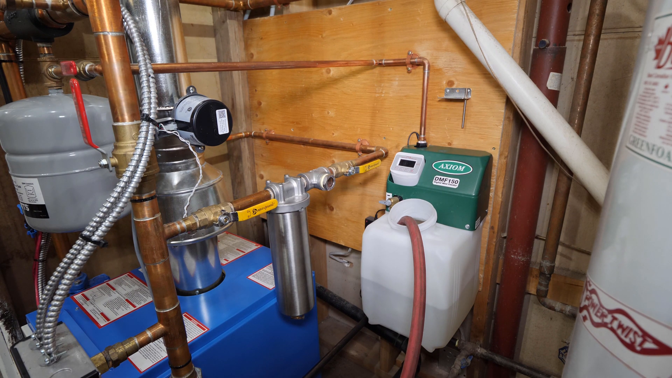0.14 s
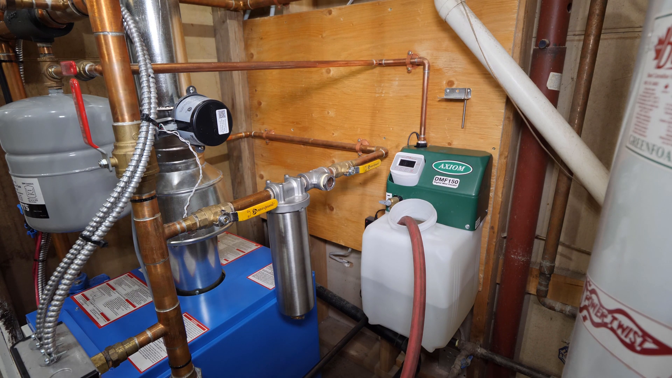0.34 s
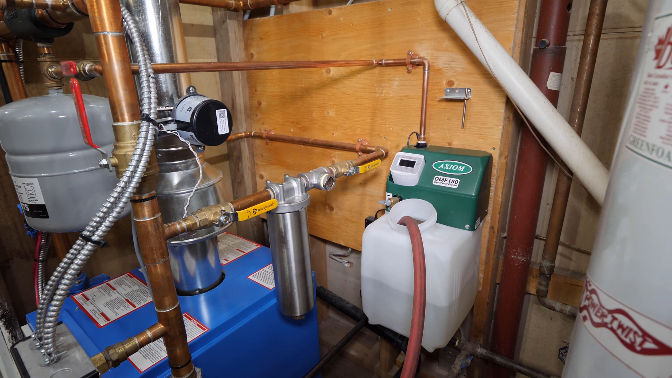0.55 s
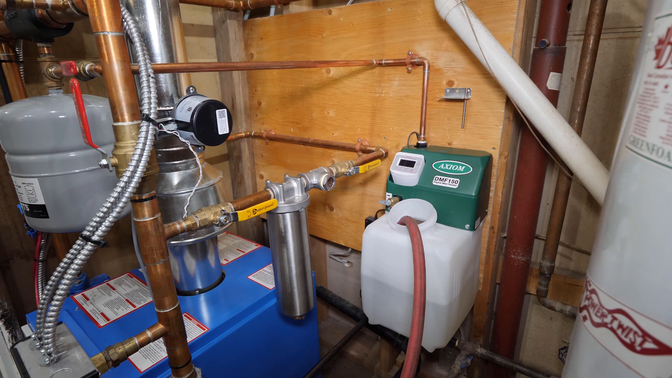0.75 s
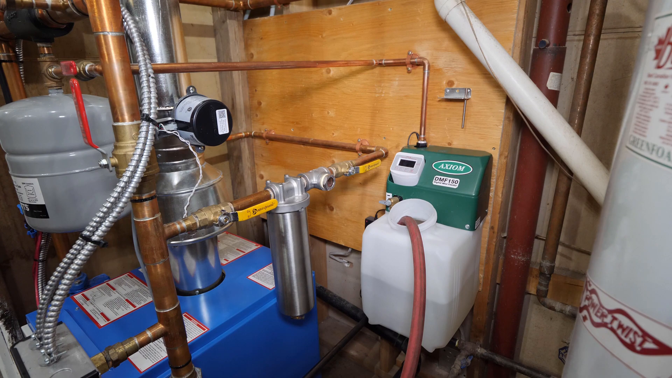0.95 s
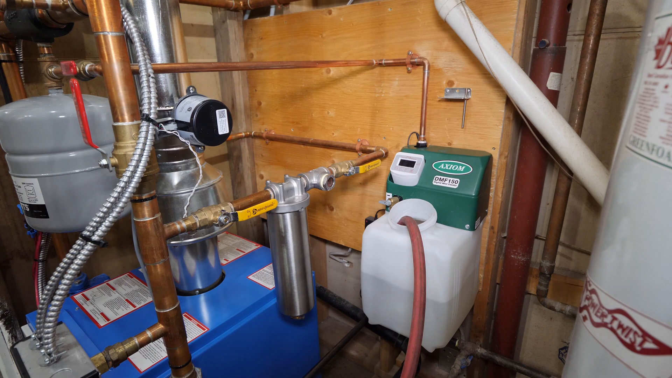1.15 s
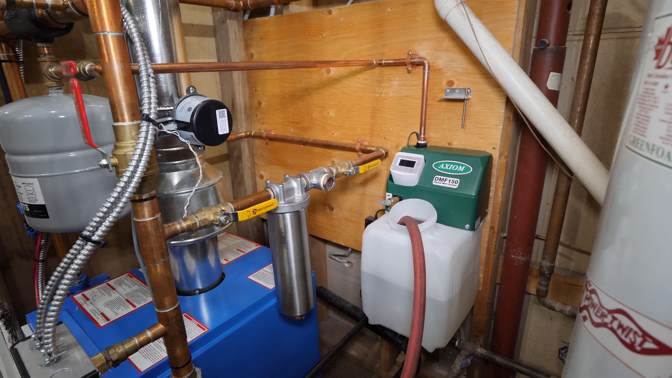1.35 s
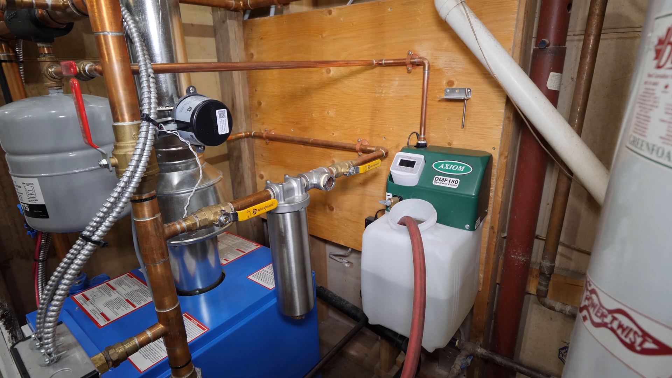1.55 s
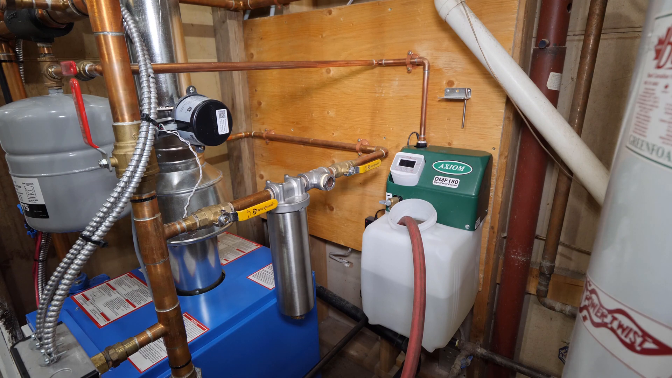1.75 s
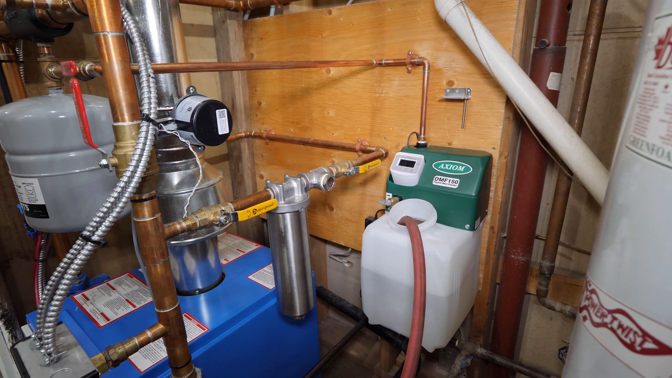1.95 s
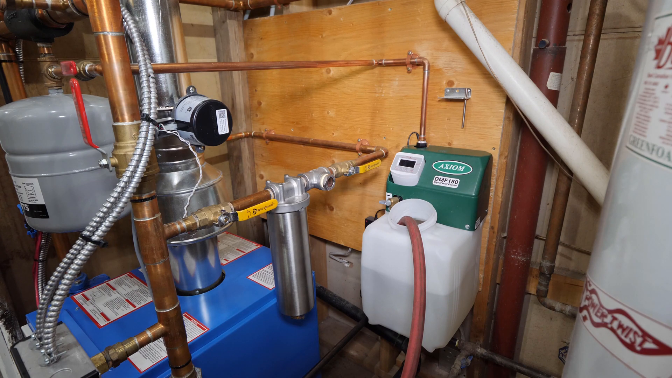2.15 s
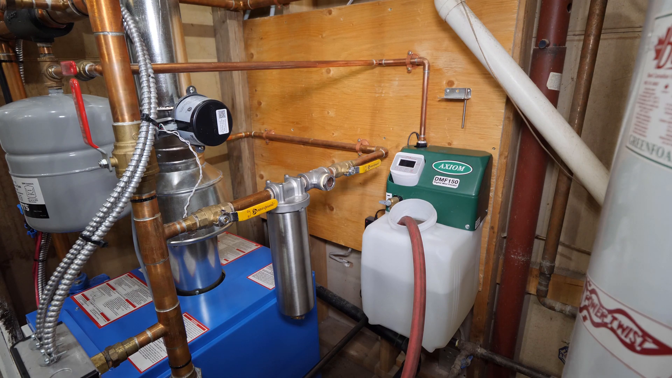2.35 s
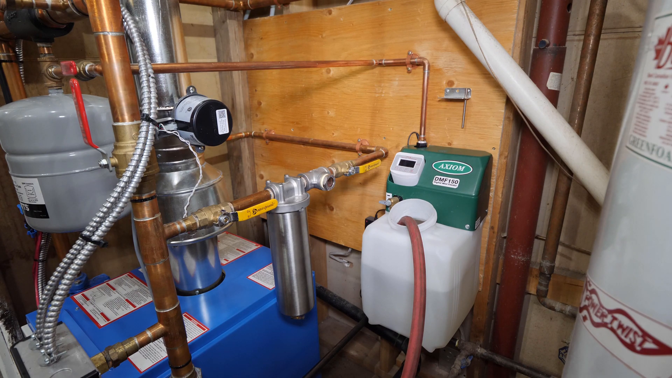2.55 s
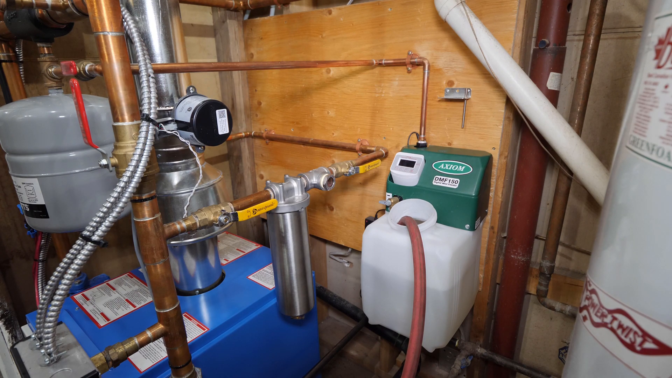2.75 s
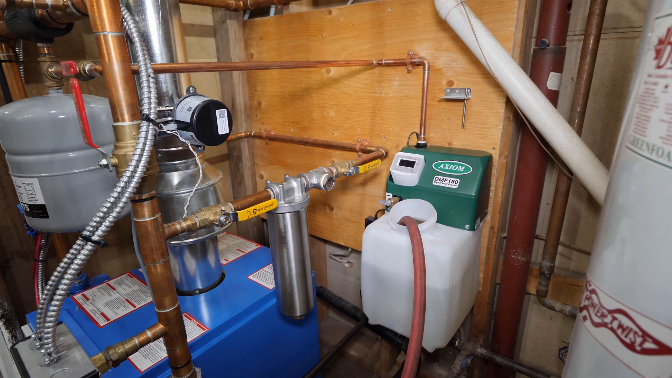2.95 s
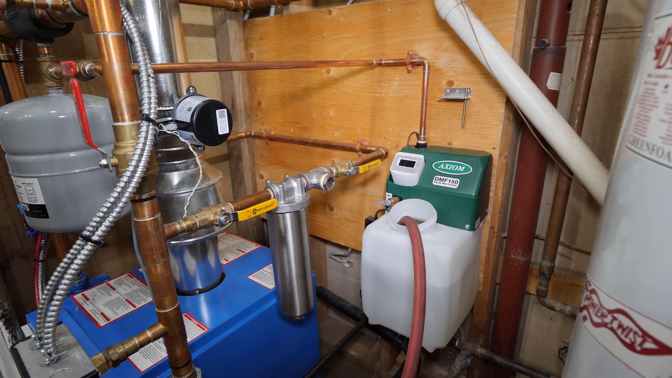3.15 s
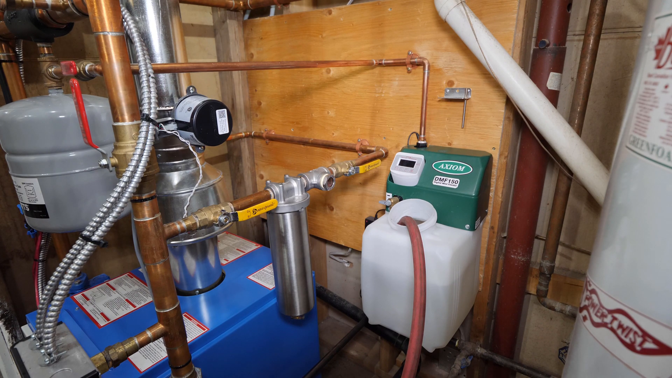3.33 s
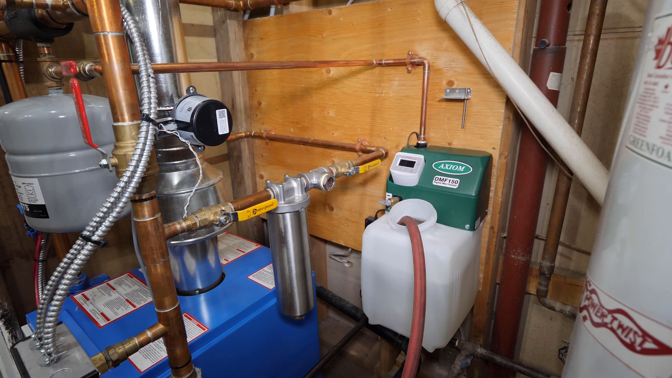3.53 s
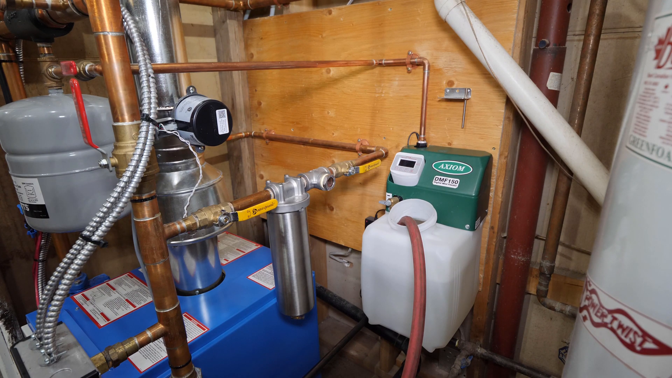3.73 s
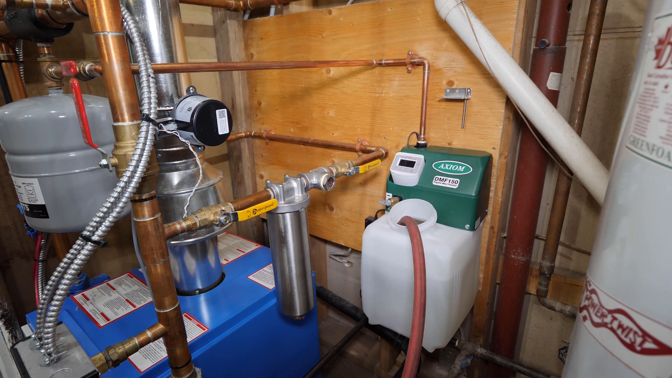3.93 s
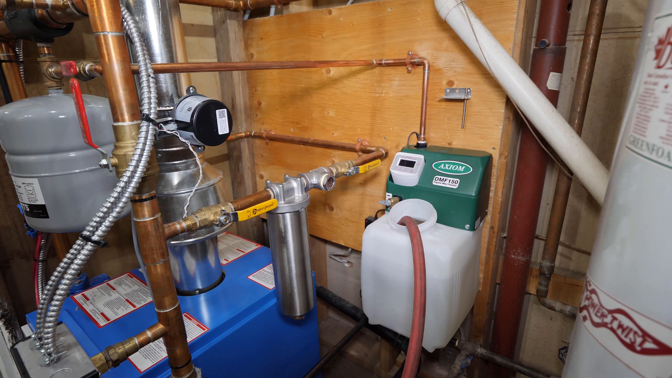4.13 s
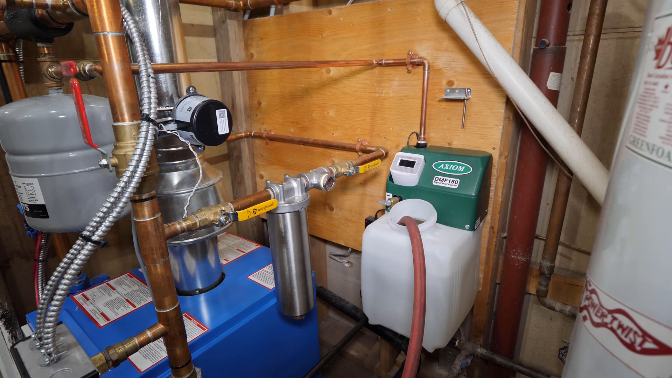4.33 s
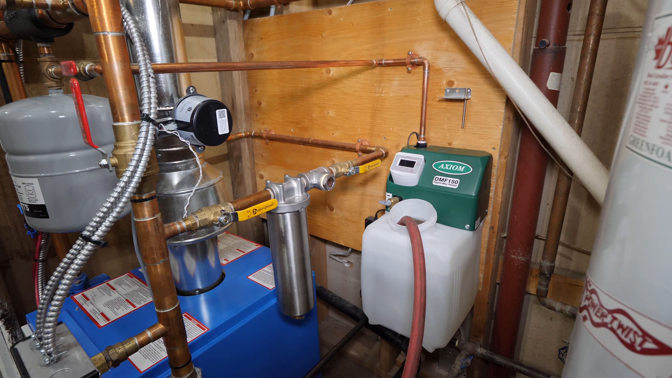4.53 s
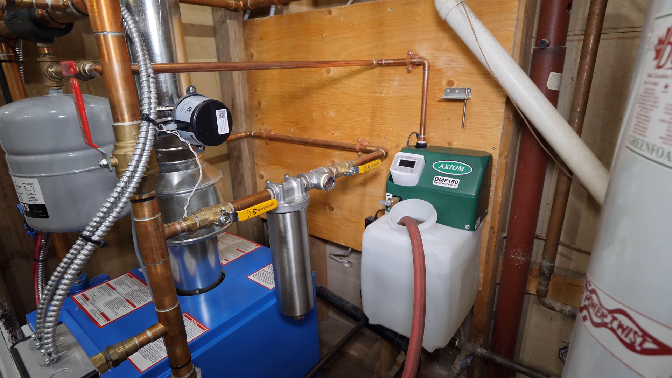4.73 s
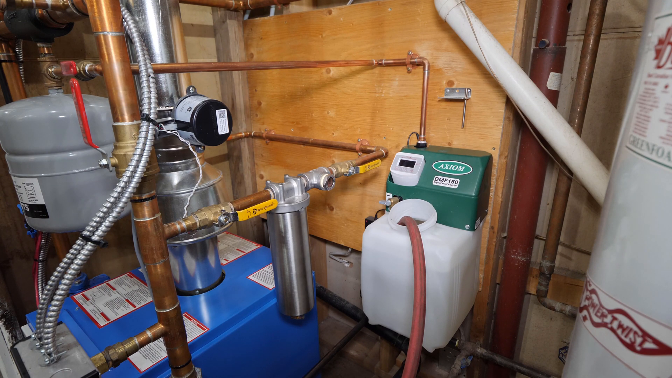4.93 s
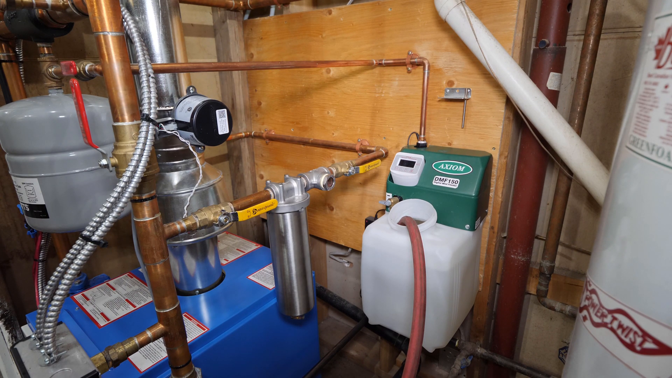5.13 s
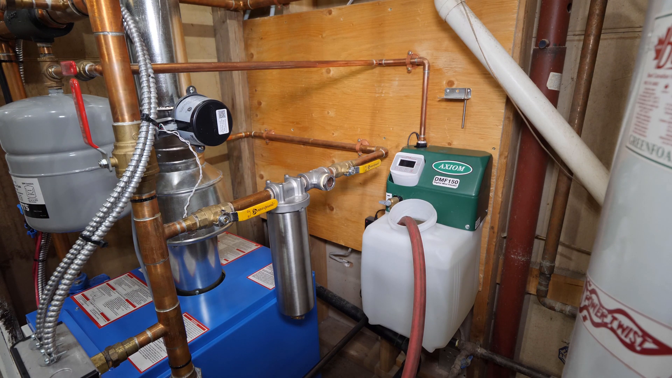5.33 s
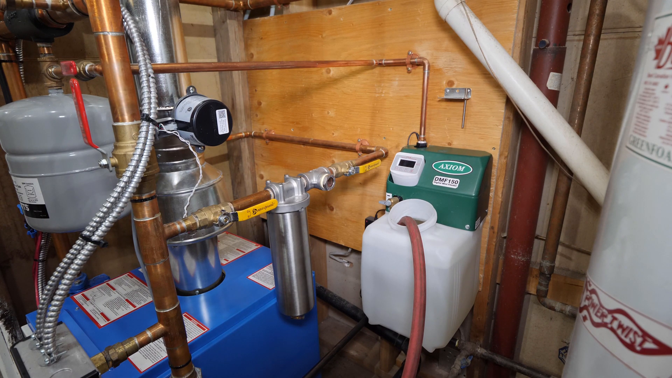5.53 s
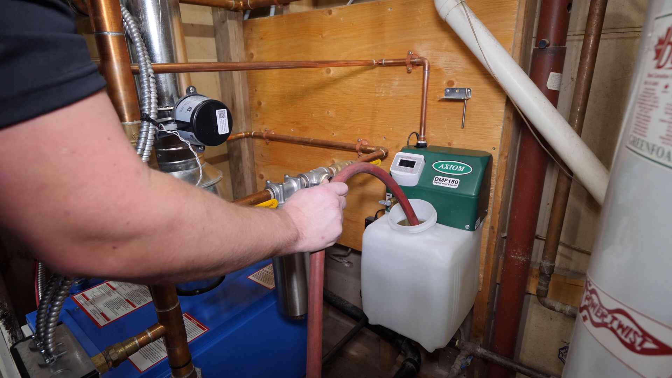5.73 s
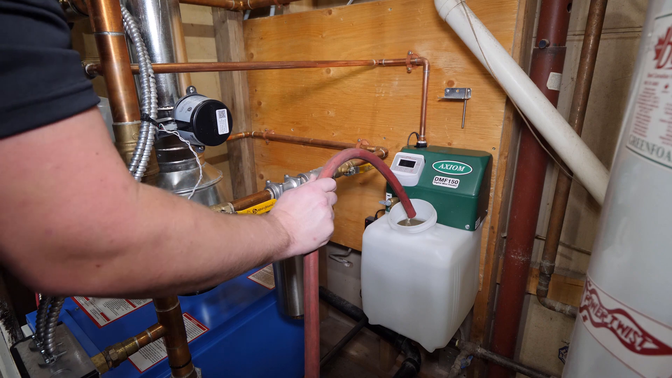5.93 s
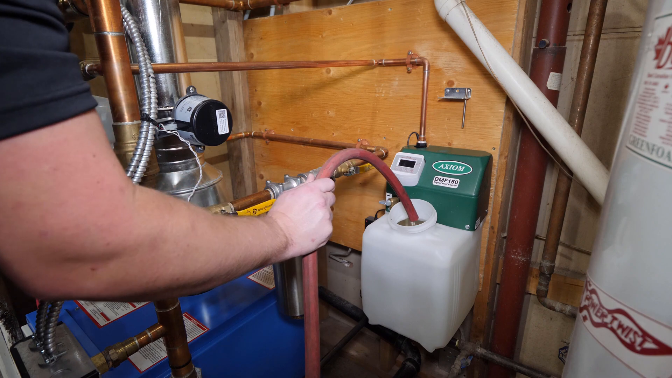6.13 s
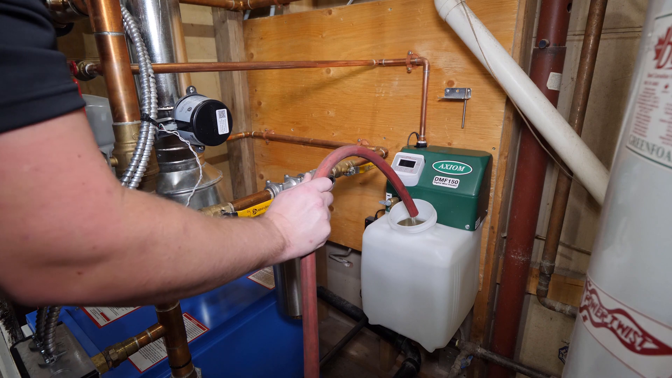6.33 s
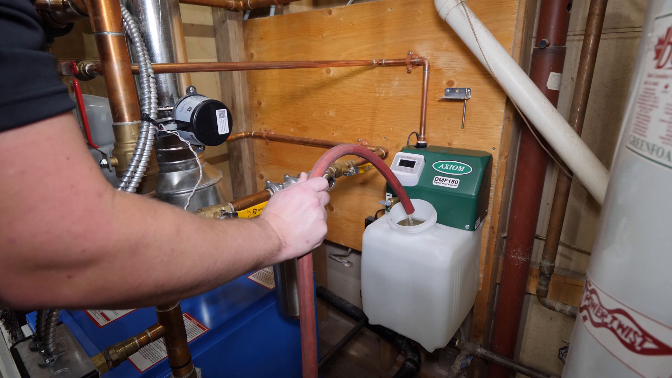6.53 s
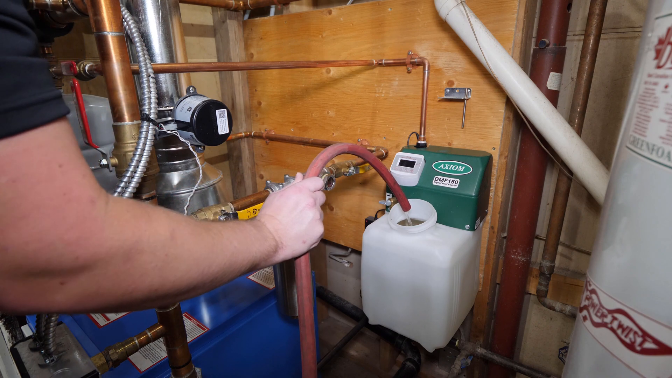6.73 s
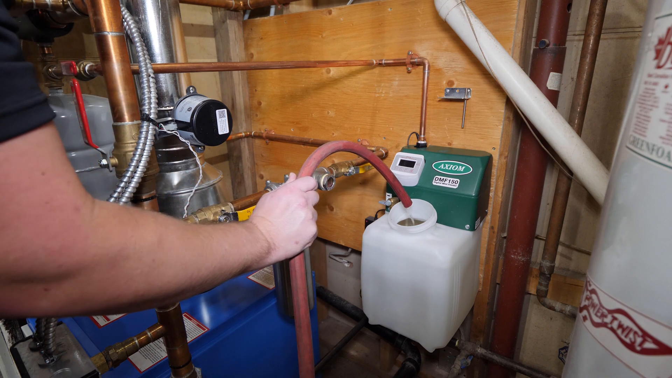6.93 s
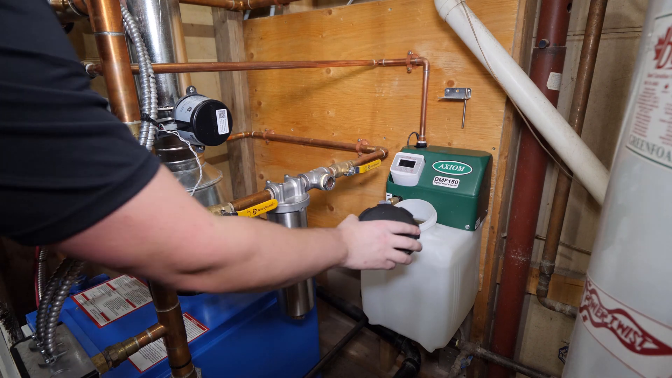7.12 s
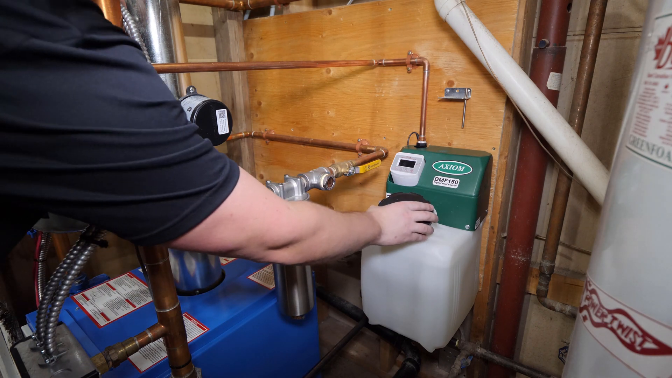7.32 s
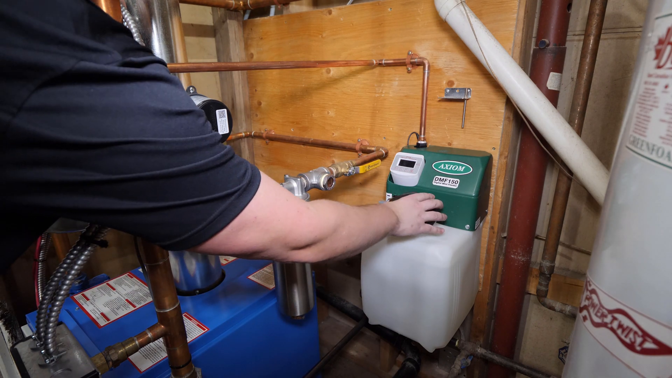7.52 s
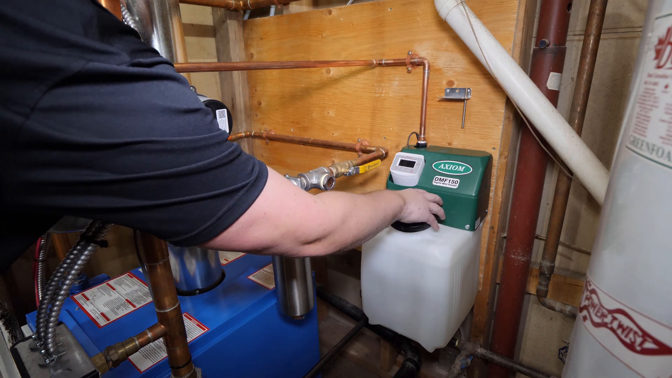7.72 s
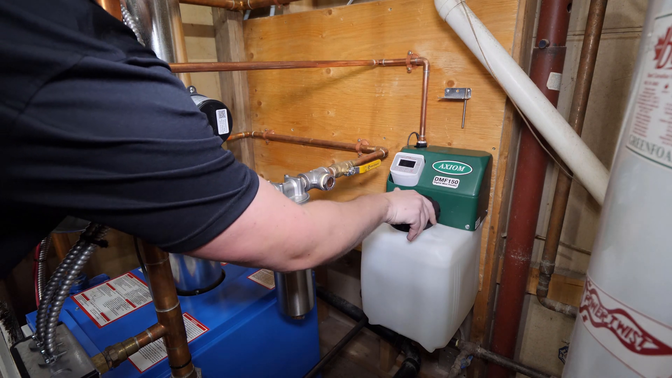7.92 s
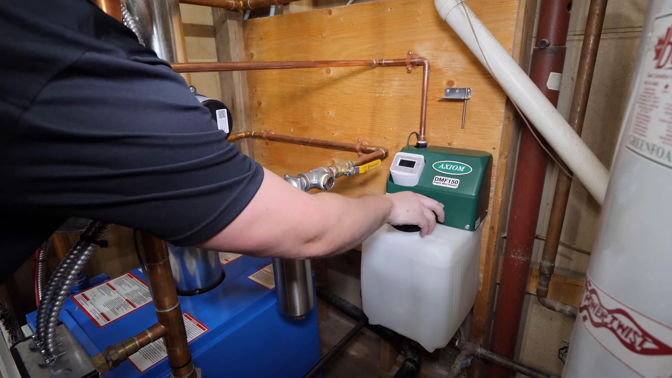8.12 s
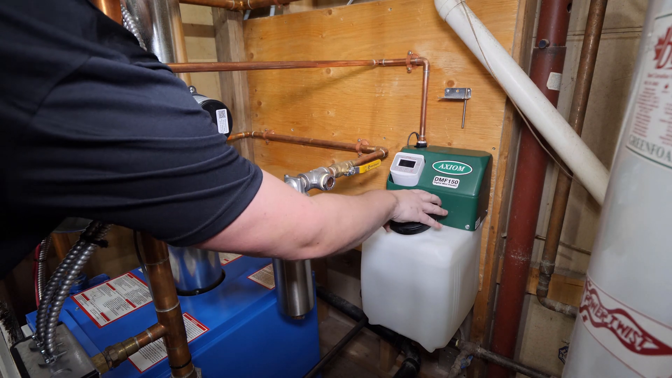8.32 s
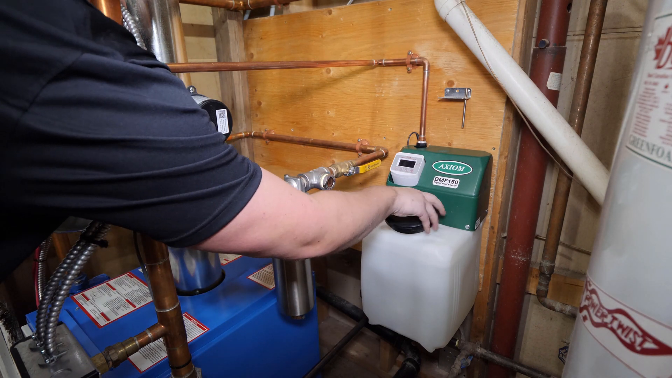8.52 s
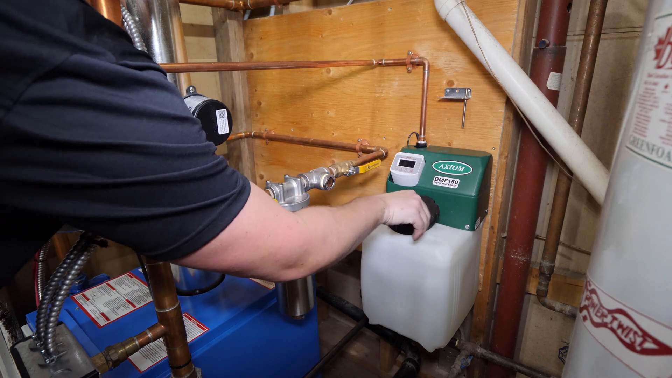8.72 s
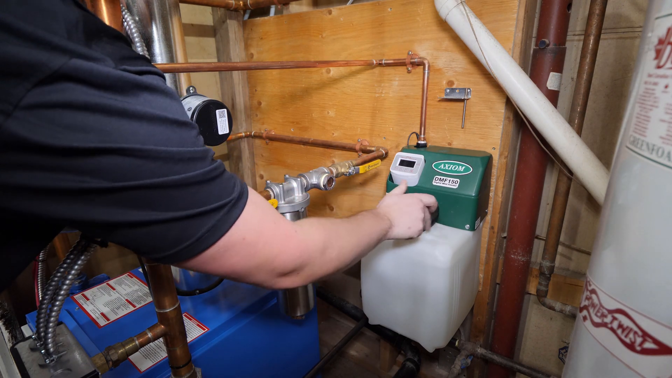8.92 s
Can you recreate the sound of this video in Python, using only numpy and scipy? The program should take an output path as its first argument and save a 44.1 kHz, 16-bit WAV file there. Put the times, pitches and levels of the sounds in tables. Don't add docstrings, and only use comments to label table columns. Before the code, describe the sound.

From 0 to about 5.4 seconds water runs steadily through pipes and a hose into a plastic tank: a dense, ringing midrange rush with a thin high valve hiss, dipping slightly near 1 second, where a pipe ticks once, then slowly building. From 5.4 to 5.6 the valve is turned shut and the flow drops away. A soft, heavy thump at 5.62 leaves faint pipe whines in quiet room air. From 6.1 to 7.05 the lifted hose empties with sharp splats, hollow rising glugs, small plinks and a patchy trickle. An abrupt cut follows; a very faint, high rubber squeak from 7.1 leads to loud plastic clacks at 7.4 to 7.9, booming in the hollow tank. The cap is screwed in scraping, rattling turns, quieter around 8.1, then with firm knocks from 8.25 to 8.95. Close stereo microphone, small room, short reverberation, slight low handling rumble.

```python
import sys
import numpy as np
from scipy import signal
from scipy.fft import rfft, irfft, next_fast_len
from scipy.io import wavfile
from scipy.ndimage import uniform_filter1d

SR = 44100
rng = np.random.default_rng(int(sys.argv[2]) if len(sys.argv) > 2 else 0)


def attenuation_scalar(level_db):
    decades = np.asarray(level_db, float) / 20
    return 10 ** decades


def unload_audio(sound):
    columns = np.transpose(np.atleast_2d(sound))
    steps = np.round(np.clip(columns, -1, 1) * 32767)
    wavfile.write(sys.argv[1], SR, steps.astype(np.int16))


N = 395577
SIZE = next_fast_len(N)
HZ, TIME = np.fft.rfftfreq(SIZE, 1 / SR), np.arange(N) / SR
VALVE_SHUT_S, SCENE_CHANGES_S = 5.62, 7.06


def noise():
    return rng.standard_normal(N)


def evened(x):
    return x / np.sqrt(np.mean(x ** 2) + 1e-20)


def read(points, hz):
    f, value = np.transpose(points)
    return np.interp(np.log(hz + 1), np.log(f + 1), value)


def curves(rows):
    s, *columns = np.transpose(rows)
    inside = 1. * (TIME > s[0] - .002) * (TIME < s[-1] + .002)
    gate = uniform_filter1d(inside, 150)
    return [np.interp(TIME, s, c) for c in columns] + [gate]


def add(mix, s, sound):
    part = mix[round(s * SR):][:len(sound)]
    part += sound[:len(part)]


def modal(modes):
    hz = HZ[::16]
    response = 0j * hz
    for k, (f, width, db) in enumerate(modes):
        response += (-1) ** k * attenuation_scalar(db) * width / 2 / (width / 2 + 1j * (hz - f))
    return np.interp(HZ, hz, response)


def shaped(x, response):
    return evened(irfft(rfft(x, SIZE) * response, SIZE)[:N])


def hum(colour, modes=(), under_db=0.):
    base = attenuation_scalar(read(colour, HZ) + under_db)
    return shaped(noise(), np.sqrt(base ** 2 + abs(modal(modes)) ** 2))


def burst(centre_hz, octaves, t60, rise=0.00038):
    t, hz = TIME[:8192], np.fft.rfftfreq(8192, 1 / SR)
    bell = np.exp(-.5 * (np.log2((hz + 1) / centre_hz) / max(octaves, .1)) ** 2)
    puff = evened(irfft(rfft(rng.standard_normal(8192)) * bell))
    return puff * attenuation_scalar(-60 * t / t60) * np.minimum(t / rise, 1)


def struck(modes, spread_db, damping, near_hz, db_per_octave):
    t = TIME[:6000]
    ring = np.zeros(len(t))
    for f, width, db in modes:
        start_db = db + spread_db * rng.standard_normal() - db_per_octave * np.log2(f / near_hz) ** 2
        ring += attenuation_scalar(start_db - damping * width * t) * np.sin(2 * np.pi * f * t + rng.uniform(0, 4.5))
    return np.pad(ring / abs(ring).max(), (0, 2192))


def echoes(decay, start):
    taps = np.zeros((2, 22050))
    slots = np.arange(start, 22000, 20)
    at = slots + rng.integers(0, 20, (2, len(slots)))
    np.put_along_axis(taps, at, rng.choice([-1., 1.], at.shape), 1)
    hz, t, z = signal.stft(taps, SR, nperseg=256)
    fading = attenuation_scalar(-60 * t / read(decay, hz)[:, None])
    tail = signal.istft(z * fading, SR, nperseg=256)[1]
    tail[:, :start] = 0
    return tail / np.linalg.norm(tail[0])


# f/Hz, t60/s
ROOM_DECAY = [(150, 0.48), (600, 0.29), (2500, 0.27), (9000, 0.17)]


def room(x, wet_db, shared):
    tail = echoes(ROOM_DECAY, start=120)
    no_bass = signal.butter(1, 500, "high", fs=SR, output="sos")
    apart = signal.sosfilt(no_bass, tail[1] - tail[0])
    tail = tail[0] + (1 - shared) * np.array([-apart, apart]) / 2
    return x + attenuation_scalar(wet_db) * signal.oaconvolve(x[None], tail, axes=1)[:, :N]


def ports(a, b, same, balance_db):
    same, a, b = np.clip(same, 0, 1), rfft(a, SIZE), rfft(b, SIZE)
    right = same * a + np.sqrt(1 - same ** 2) * b
    pair = np.array([a * attenuation_scalar(balance_db / 2), right * attenuation_scalar(-balance_db / 2)])
    return irfft(pair, SIZE)[:, :N]


# f/Hz, level/dB per Hz
RUMBLE = [(20, 1.5), (100, 5.5), (160, -13), (300, -27), (1000, -88)]


def handling_rumble(dry):
    lowpass = signal.butter(2, 300, fs=SR, output="sos")
    shocks = signal.sosfiltfilt(lowpass, dry.mean(0))
    shake = np.sqrt(abs(uniform_filter1d(shocks ** 2, 2000)))
    steady = attenuation_scalar(-92.0 - 7.2 * (TIME > VALVE_SHUT_S))
    return (steady + attenuation_scalar(-35.0) * shake) * ports(hum(RUMBLE), hum(RUMBLE), 1.0, .5)


# f/Hz, level/dB per Hz
ROOM_AIR = [(24, -82), (55, -44), (110, -9), (150, -11), (280, -11), (359, -4.5), (562, -5.5), (704, -6.5),
            (1220, -6.5), (9650, -13), (13300, -15), (15500, -42)]
ROOM_AIR_DB = -62
# start t/s, end t/s, f/Hz, width/Hz, level/dB
WHINES = [
    (5.62, 6.8, 4860, 84, -66.5),
    (5.62, 6.4, 5200, 250, -72),
    (5.62, 6.2, 4700, 90, -74),
    (5.62, 6.45, 739, 24, -70),
    (5.7, 6.4, 810, 37, -69.5),
    (5.616, 6.296, 207.5, 15, -63),
    (5.62, 6.302, 2087, 60, -75),
    (8.123, 8.3, 2220, 200, -58),
]


def quiet_room():
    likeness = read([(300, 0.99), (3000, 0.48)], HZ)
    air_db = ROOM_AIR_DB - 4.2 * (TIME < SCENE_CHANGES_S)
    air = attenuation_scalar(air_db) * ports(hum(ROOM_AIR), hum(ROOM_AIR), likeness, 0.)
    for start, end, hz, width, db in WHINES:
        fade = np.clip((end - TIME) / 0.57, 0, 1) * (TIME > start)
        air = air + attenuation_scalar(db) * fade * shaped(noise(), modal([(hz, width, 0)]) ** 2)
    return air * np.clip((TIME - 5.55) / .06, .03, 1)


# t/s, level/dB, length/s
THUMP = (5.618, -29.5, 0.009)
# f/Hz, level/dB per Hz
THUMP_COLOUR = [(35, -58), (75, -7), (130, -6), (220, -6), (480, -2.5), (800, -2.5), (948, -15),
                (1460, -19), (1600, -26), (4080, -20.5), (5620, -32), (7740, -29), (14000, -41)]
# f/Hz, t60/s
THUMP_DECAY = [(100, 0.8), (300, 0.29), (800, 0.2), (3000, 0.28), (10000, 0.23)]


def thump():
    s, db, length = THUMP
    push = np.zeros(N)
    add(push, s, rng.standard_normal(2000) * np.exp(-TIME[:2000] / length))
    ring = signal.oaconvolve(push, echoes(THUMP_DECAY, start=1)[0])[:N]
    ring = shaped(ring, attenuation_scalar(read(THUMP_COLOUR, HZ))) * np.clip((TIME - s) / 0.0038, 0, 1)
    loudest = np.sqrt(uniform_filter1d(ring ** 2, 800).max())
    return attenuation_scalar(db) * ring / loudest


# t/s, f/Hz, level/dB
SQUEAK = [
    (7.09, 9647, -76),
    (7.124, 12653, -73),
    (7.134, 13200, -81),
    (7.222, 13300, -79),
    (7.26, 13989, -79),
    (7.3, 12696, -90.5),
    (7.338, 13264, -86),
    (7.38, 13608, -77),
]


def squeak():
    hz, db, gate = curves(SQUEAK)
    waver = 1 + .006 * evened(uniform_filter1d(noise(), 200))
    phase = 2 * np.pi * np.cumsum(hz * waver) / SR
    lower = .5 * (TIME > 7.14) * (TIME < 7.26) * np.sin(0.96 * phase)
    return np.sqrt(2) * attenuation_scalar(db + 9.5) * gate * (np.sin(phase) + lower)


# t/s, f/Hz, level/dB
NECK = [
    (6.2, 760, -68),
    (6.29, 750, -56),
    (6.39, 736, -55),
    (6.45, 750, -72),
    (6.47, 760, -49),
    (6.58, 715, -48),
    (6.66, 680, -52),
    (6.79, 608, -67),
    (7.05, 610, -69),
]
NECK_WIDTH_HZ = 30


def neck():
    hz, db, gate = curves(NECK)
    r = np.exp(-np.pi * NECK_WIDTH_HZ / SR)
    slow = signal.lfilter([1], np.convolve([1, -r], [1, -r]), noise() + 1j * noise())
    carrier = np.exp(2j * np.pi * np.cumsum(hz) / SR)
    return attenuation_scalar(db) * gate * evened((slow * carrier).real)


# t/s, level/dB, f/Hz
GLUGS = [(6.204, -32, 756), (6.244, -41.5, 741), (6.336, -44, 726), (6.459, -36, 769), (6.484, -35.5, 711),
         (6.514, -34, 746), (6.561, -38, 687), (6.623, -50, 735), (6.656, -42.5, 668), (6.704, -49, 634),
         (6.759, -68, 620), (6.824, -60, 810), (6.944, -48, 761)]
# t/s, level/dB, f/Hz
PLINKS = [(6.2505, -43, 1233), (6.2646, -43, 1130), (6.354, -45, 947), (6.3742, -42, 1000),
          (6.393, -39, 1445), (6.461, -47, 1760), (6.6378, -47, 1610), (6.6837, -42.5, 1620),
          (6.7026, -50, 1620), (6.886, -40.5, 2420), (6.9384, -45, 3910), (6.943, -48, 4080),
          (6.955, -51, 3920), (6.3, -51, 2480), (6.52, -51, 1970), (6.98, -55, 5700), (6.9944, -51, 1950),
          (6.371, -46, 1950), (6.976, -58, 775), (6.99, -63, 1410), (7.03, -47, 3650), (6.862, -51, 3680)]
BUBBLE_T60_S, BUBBLE_T60_POWER = 0.075, -0.66


def bubbles():
    out, t = np.zeros(N), TIME[:8000]
    for s, db, hz in list(GLUGS) + list(PLINKS):
        t60 = BUBBLE_T60_S * (hz / 750) ** BUBBLE_T60_POWER
        swell = attenuation_scalar(-60 * t / t60) * (1 - np.exp(-t / 0.0063))
        tone = np.sin(2 * np.pi * hz * (t + 0.17 * t ** 2))
        add(out, s, attenuation_scalar(db) * swell / swell.max() * tone)
    return out


# t/s, level/dB, centre f/Hz
SPLATS = [(6.127, -27, 10500), (6.205, -38.5, 4930), (6.2485, -36, 3280), (6.336, -32, 5000),
          (6.387, -30, 5700), (6.469, -33.5, 7600), (6.519, -35.5, 7140), (6.554, -47, 3650),
          (6.6074, -36, 7000), (6.703, -48, 3150), (6.7445, -35.5, 10300), (6.7844, -44, 5760),
          (6.8237, -31, 9300), (6.8833, -33, 12500), (6.9044, -39, 7300), (6.969, -35.5, 5710),
          (6.993, -36, 7750)]
# t/s, level/dB
SPRAY = [(6.1494, -55), (6.2544, -38), (6.389, -34), (6.4094, -41), (6.4373, -38), (6.477, -40),
         (6.5555, -44), (6.5744, -51), (6.6014, -40), (6.6648, -41), (6.7027, -46), (6.7794, -43),
         (6.9696, -43)]
# f/Hz, width/Hz, level/dB
AIR_MODES = [(620, 16, -8), (860, 66, -7), (1026, 23, -6), (1427, 34, -1.5), (1620, 57, -7.5),
             (1950, 210, -9.5), (2300, 70, -14), (2800, 23, -16), (3150, 51, -10), (3650, 41, -7),
             (4810, 62, -12.5), (5900, 59, -23)]
SPLAT_OCTAVES, WIDER_PER_DB = .3, .045
SPRAY_HZ, SPRAY_OCTAVES = 10500, 0.14


def drops():
    out = np.zeros(N)
    for s, db, hz in SPLATS:
        octaves = SPLAT_OCTAVES + WIDER_PER_DB * (db + 40.5)
        add(out, s, attenuation_scalar(db - 11.5) * burst(hz, octaves, 0.12))
    out = out + attenuation_scalar(-9.5) * np.sqrt(np.mean(out ** 2)) * shaped(out, modal(AIR_MODES))
    for s, db in SPRAY:
        add(out, s, attenuation_scalar(db - 11.5) * burst(SPRAY_HZ * rng.uniform(0.98, 1.11), SPRAY_OCTAVES, 0.064))
    return out


# t/s, level/dB
TRICKLE = [
    (6.2, -53),
    (6.246, -58),
    (6.252, -37.5),
    (6.33, -53),
    (6.404, -46),
    (6.596, -60.5),
    (6.704, -45.5),
    (6.818, -56.5),
    (7.05, -50.5),
]
# f/Hz, level/dB per Hz
TRICKLE_COLOUR = [(290, -67), (500, -33), (724, -24), (909, -36), (1450, -18), (2500, -10), (2920, -21),
                  (3940, -9.5), (10800, -17.5), (15000, -41)]


def trickle():
    db, gate = curves(TRICKLE)
    steady = hum(TRICKLE_COLOUR, AIR_MODES, under_db=-6.0)
    z = signal.stft(steady, SR, nperseg=512)[2]
    patches = uniform_filter1d(rng.standard_normal(z.shape), 9, 0)
    patches = evened(uniform_filter1d(patches, 5, 1))
    patchy = evened(signal.istft(z * attenuation_scalar(4.4 * patches), SR, nperseg=512)[1][:N])
    return attenuation_scalar(db - 3) * gate * patchy


def dribble():
    return bubbles() + drops() + neck() + trickle()


# start t/s, rise/s, hold/s, grip level/dB, rattle change as it seats/dB
TURNS = [
    (7.381, 0.24, 0.048, -32, -1.5),
    (7.681, 0.075, 0.18, -29, -42),
    (8.24, 0.021, 0.13, -40.5, -10.5),
    (8.471, 0.18, 0.14, -29.5, -5.5),
    (8.925, 0.024, 0.03, -29.5, -15),
]
RISE_FROM_DB, LET_GO_DB_PER_S = -31.5, -330
RATTLE_DB, THREAD_HISS_DB, HISS_SLOPE = 0.7, -44.5, 0.45


def turns():
    rattle, boom, hiss = np.zeros((3, N))
    for start, rise, hold, grip_db, seat_db in TURNS:
        t = TIME - start
        rise_db = RISE_FROM_DB * np.clip(1 - t / rise, 0, 1)
        let_go_db = LET_GO_DB_PER_S * np.maximum(t - rise - hold, 0)
        shape = attenuation_scalar(rise_db + let_go_db) * np.clip(t / 0.011, 0, 1)
        seated = np.clip(t / (rise + hold), 0, 1) ** 2
        rattle = rattle + shape * attenuation_scalar(grip_db + RATTLE_DB + seat_db * seated)
        boom = boom + shape * attenuation_scalar(grip_db)
        hiss = hiss + shape * attenuation_scalar(THREAD_HISS_DB + HISS_SLOPE * (grip_db + 32.5 - rise_db))
    return rattle, boom, hiss


# f/Hz, width/Hz, level/dB
TANK_MODES = [(165.6, 25, -3), (216, 26, -6.5), (263, 23, -7), (298, 19, -12), (323, 39, -1),
              (362.5, 21, -2.5), (394.6, 12.6, -4.5), (428, 40, -4.5), (565, 37, -3.5), (648, 32, -7),
              (711, 21, -7)]
# f/Hz, width/Hz, level/dB
CAP_MODES = [(832, 81, 11), (986, 230, 5), (1170, 140, 8.5), (1286, 61, 6.5), (1360, 36, -5),
             (1490, 130, 7), (1700, 150, -6), (1950, 140, -3), (2110, 140, 7.5), (2376, 130, -3),
             (2830, 98, -43)]
# f/Hz, level/dB per Hz
CRACK_COLOUR = [(1470, -2.5), (2500, -7.5), (3720, -3.5), (6640, -8.5), (7980, -10.5), (9440, -13),
                (12600, -18.5), (15500, -42)]


def screwing():
    rattle, drum, hiss = turns()
    slips = attenuation_scalar(6.0 * np.minimum(rng.exponential(1, N), 4)) * rng.choice([-1, 1], N)
    slips = slips * (rng.random(N) < 700 / SR)
    rub = evened(slips) + 0.96 * noise()
    shell = rattle * shaped(rub, modal(CAP_MODES))
    tank = drum * shaped(rub, modal(TANK_MODES))
    crackle = hiss * shaped(rub + noise(), attenuation_scalar(read(CRACK_COLOUR, HZ)))
    return shell + tank + crackle


# t/s, level/dB, hardness/dB, cap f/Hz, squareness/dB (how much it drums the tank)
KNOCKS = [(7.327, -41, -13, 604, -9), (7.391, -7, -28.5, 1244, 1.5), (7.522, -21.5, -25, 700, 3),
          (7.539, -5.5, -26.5, 1250, 4), (7.5441, -11.5, -24, 1900, 9.5), (7.588, -5.5, -18, 1250, -17),
          (7.597, -12, -28, 1110, -16), (7.623, -8, -28, 820, -13), (7.7187, -3, -16, 1573, -22),
          (7.725, -18.5, -18, 1870, -6), (7.758, -14, -28, 1250, -4), (7.8674, -15, -11, 2180, 7),
          (7.872, -12, -15, 1140, 4), (7.964, -28.5, 1, 1150, -10), (7.975, -32, -21, 500, -2),
          (8.118, -52.5, 10.5, 972, 0), (8.193, -44.5, -12, 835, 10), (8.2574, -21, -14, 1690, 11),
          (8.2739, -12.5, -14.5, 1580, 7), (8.293, -16, -29, 880, 6), (8.329, -24, -7, 740, -15),
          (8.531, -51, -17, 1770, -12), (8.545, -32, -14, 1840, -16), (8.555, -24.5, -7.5, 1170, 4),
          (8.604, -12, -23, 1530, 7), (8.613, -12, -6.5, 1130, 8), (8.6339, -7.5, -22, 1210, 2),
          (8.667, -18, -24, 1000, 0), (8.75, -16, -22, 1390, 2), (8.8, -11, -29, 910, 2),
          (8.845, -20, -34, 1070, 9.5), (8.723, -11.5, -11.5, 1220, -3), (8.775, -12.5, -18, 1140, 11),
          (8.7853, -10.5, -32, 1490, 4), (8.934, -30, -19, 700, 15), (8.937, -26.5, -26, 1840, 13),
          (8.949, -19, -15, 1360, -11)]
BOOM_DB, BOOM_SLOPE = -21.5, 0.71


def knocks():
    out, t = np.zeros(N), TIME[:8192]
    for s, db, hard_db, hz, square_db in KNOCKS:
        boom = struck(TANK_MODES, 2.6, 25.0, near_hz=370, db_per_octave=3.0)
        boom = boom * (1 - np.exp(-t / 0.0052))
        clack = 0.8 * burst(hz, 0.79, 0.051, rise=0.00039)
        tone = 2.7 * attenuation_scalar(-60 * t / 0.014) * np.sin(2 * np.pi * hz * t) * np.minimum(t / 0.00079, 1)
        ring = 0.82 * struck(CAP_MODES, 2.8, 20.0, near_hz=hz, db_per_octave=15.)
        shell = clack + tone + ring * np.minimum(t / 0.00067, 1)
        tick = 0.53 * burst(5900, 0.51, 0.068, rise=0.0004) + burst(4700, 0.99, 0.0064, rise=0.00028)
        boom_db = BOOM_DB + BOOM_SLOPE * (db + 12.0) + square_db
        add(out, s, attenuation_scalar(db - 9.0) * shell + attenuation_scalar(boom_db) * boom + attenuation_scalar(db + hard_db - 4.5) * tick)
    return out


# t/s, level/dB, f/Hz
PIPE_TICK = [
    (1.005, -26.5, 7400),
]


def pipe_tick():
    out = np.zeros(N)
    for s, db, hz in PIPE_TICK:
        add(out, s, attenuation_scalar(db - 7.5) * burst(hz, 0.73, 0.1, rise=0.00045))
        add(out, s, attenuation_scalar(-61.0) * burst(370, 0.38, 0.75, rise=0.018))
    return out


# f/Hz, level/dB per Hz
FLOW_COLOUR = [(120, -106), (280, -41), (440, -38.5), (615, -33.5), (900, -29), (4300, -39), (4800, -33),
               (6110, -45), (10300, -120)]
# f/Hz, width/Hz, level/dB
PIPE_MODES = [(388, 80, -27), (672, 24, -22), (729, 73, -18), (790, 22, -20), (869, 61, -10),
              (928, 34, -10), (990, 20, -23), (1088, 38, -3), (1127, 56, -8), (1200, 29, -12),
              (1253, 64, -7), (1312, 60, -3), (1365, 58, -2), (1495, 47, -9), (1577, 35, -11),
              (1637, 33, -3), (1677, 35, -7), (1758, 70, -4), (1841, 60, -11), (1934, 43, -3),
              (1991, 103, -8), (2062, 62, -12), (2138, 75, -17), (2216, 83, -14), (2298, 20, -15),
              (2381, 63, -6), (2463, 45, 0), (2585, 81, -3), (2688, 43, -6), (2785, 53, -12),
              (2850, 48, -9), (2973, 44, -2), (3017, 52, -1), (3076, 62, -7), (3118, 23, -9),
              (3163, 32, -4), (3267, 96, -4), (3399, 35, -5), (3443, 71, -7), (3550, 50, -5),
              (3627, 132, -15), (3708, 30, -16), (3749, 97, -19), (3823, 61, -11), (3869, 37, -10),
              (3979, 52, -9), (4057, 49, -7), (4135, 84, -13), (4214, 63, -9), (4284, 62, -5),
              (4375, 70, -10), (4498, 37, -21), (4547, 32, -23), (4601, 46, -18), (4648, 94, -16)]


def ringing_pipes():
    hz = HZ[::16]
    power = attenuation_scalar(read(FLOW_COLOUR, hz)) ** 2
    for f, width, db in PIPE_MODES:
        power = power + (attenuation_scalar(db) / (1 + (2 * (hz - f) / width) ** 2)) ** 2
    power = power / (1 + (270 / (hz + 1)) ** 4)
    return shaped(noise(), np.interp(HZ, hz, np.sqrt(power)))


# t/s, level/dB
FLOW = [
    (0, -36),
    (1, -38.5),
    (1.5, -36.5),
    (2.3, -34.5),
    (5.36, -31.5),
    (5.62, -31),
]
# t/s, opening level/dB
CLOSING = [
    (5.36, -0.5),
    (5.42, -9),
    (5.53, -11.5),
    (5.58, -20),
    (5.62, -18),
]
# f/Hz, level/dB per Hz
HISS_COLOUR = [(2650, -26), (4500, -2), (4900, -10.5), (5190, -10.5), (6720, -7), (7750, -7), (8750, -10),
               (10400, -11.5), (12600, -18.5), (13400, -10), (14500, -7), (15400, -3), (15900, -6.5)]
# f/Hz, width/Hz, level/dB
VALVE_MODES = [(5720, 7.8, -5), (6102, 120, -6.5), (6490, 35, -3.5), (6680, 35, 1), (6960, 22, 4),
               (7300, 130, -11), (8040, 61, -15.5), (8340, 73, -14.5), (8950, 36, -27.5), (9100, 110, -15),
               (9870, 130, -15.5), (10200, 26, -14), (10500, 67, -12), (10840, 64, -11.5),
               (11300, 110, -18.5), (11970, 49, -11), (12400, 43, -13), (13200, 40, -19), (13580, 140, -8),
               (13860, 60, -4), (14200, 64, -8), (14600, 100, -11), (14910, 70, -3.5), (15660, 52, -2)]
# f/Hz, t60/s
WALL_DECAY = [(300, 0.058), (3000, 0.094), (12000, 0.024)]
# f/Hz, likeness (0 to 1)
FLOW_SAME = [(60, 0.59), (180, 1.0), (550, 1), (1650, 0.98), (4970, 0.68), (15000, 0.75)]
# f/Hz, level/dB
FLOW_BALANCE = [(60, 15), (180, 4.5), (550, 3.5), (1650, 0.5), (4970, 4), (15000, 0)]
LOW_PIPES_DB, VALVE_HISS_DB = -33.5, -43
LOW_FOLLOWS, HISS_FOLLOWS = 0.58, 0.25


def flow():
    ring_db, gate = curves(FLOW)
    shut_db = curves(CLOSING)[0]
    flicker = attenuation_scalar(0.61 * evened(uniform_filter1d(noise(), 500))) * gate
    upper, low = attenuation_scalar(ring_db + shut_db), attenuation_scalar(LOW_PIPES_DB + LOW_FOLLOWS * shut_db)
    hiss_level = attenuation_scalar(VALVE_HISS_DB + HISS_FOLLOWS * shut_db)
    lowpass = signal.butter(4, 1450, fs=SR, output="sos")
    pair = []
    for wall in echoes(WALL_DECAY, start=60):
        pipes = ringing_pipes()
        pipes = upper * pipes + (low - upper) * signal.sosfiltfilt(lowpass, pipes)
        hiss = flicker * hiss_level * hum(HISS_COLOUR, VALVE_MODES, under_db=-8.5)
        wall_hiss = attenuation_scalar(-4.0) * signal.oaconvolve(hiss, wall)[:N]
        pair.append(flicker * pipes + hiss + wall_hiss)
    pair[0] = pair[0] + pipe_tick()
    return ports(*pair, read(FLOW_SAME, HZ), read(FLOW_BALANCE, HZ))


def scene():
    water_ends = np.clip((SCENE_CHANGES_S - TIME) / 0.036, 0, 1)
    water = attenuation_scalar([[-.6], [.6]]) * room(dribble(), -4.0, 0.29) * water_ends
    lid = attenuation_scalar([[-.3], [.3]]) * room(screwing() + knocks(), -4.1, 0.45)
    late = quiet_room() + room(thump() + squeak(), -10.0, 0.2) + water + lid
    late_edge = signal.cheby2(8, 40, 15600, fs=SR, output="sos")
    return flow() + signal.sosfilt(late_edge, late)


def roll_off(x):
    return signal.sosfilt(signal.butter(12, 16580, fs=SR, output="sos"), x)


def record(dry):
    bass_cut = signal.butter(5, 125, "high", fs=SR, output="sos")
    heard = signal.sosfilt(bass_cut, dry) + handling_rumble(dry)
    treble_edge = signal.firwin(1023, 15700, window=("kaiser", 9), fs=SR)
    mix = signal.oaconvolve(heard, treble_edge[None], "same")
    return roll_off(mix)


dry = scene()
out = record(dry)
unload_audio(out)
```